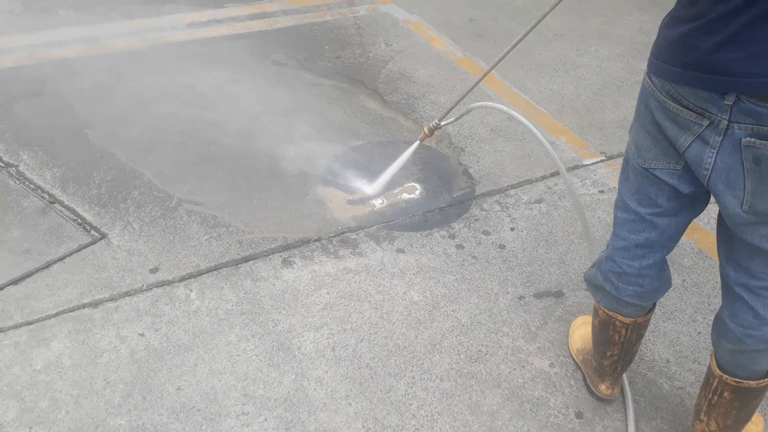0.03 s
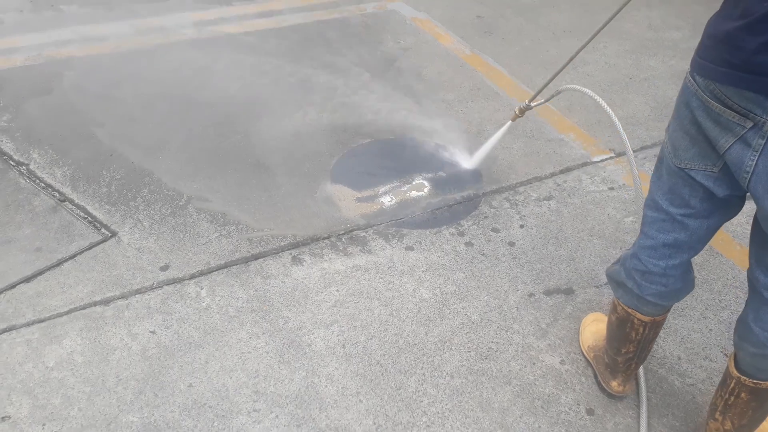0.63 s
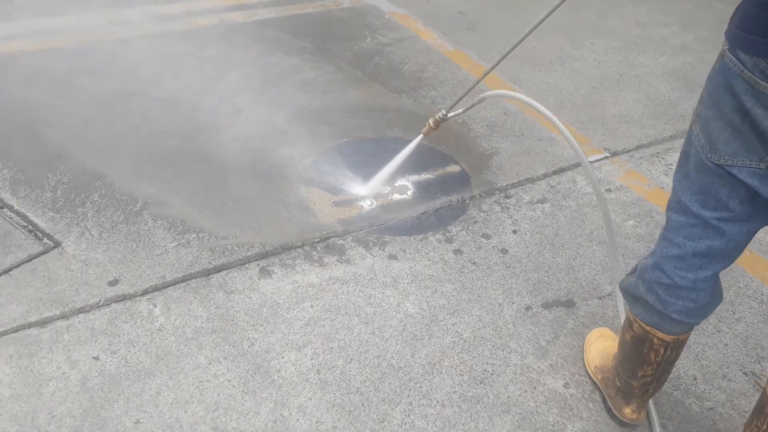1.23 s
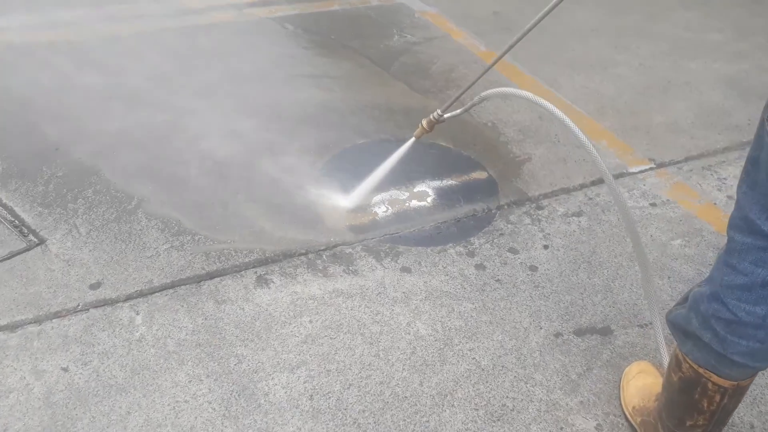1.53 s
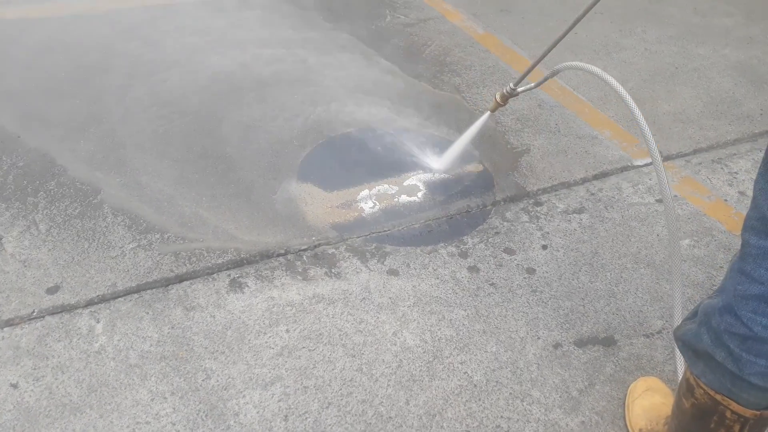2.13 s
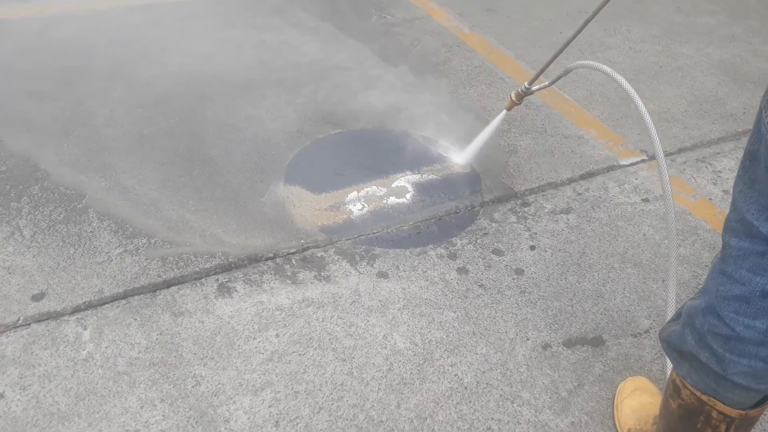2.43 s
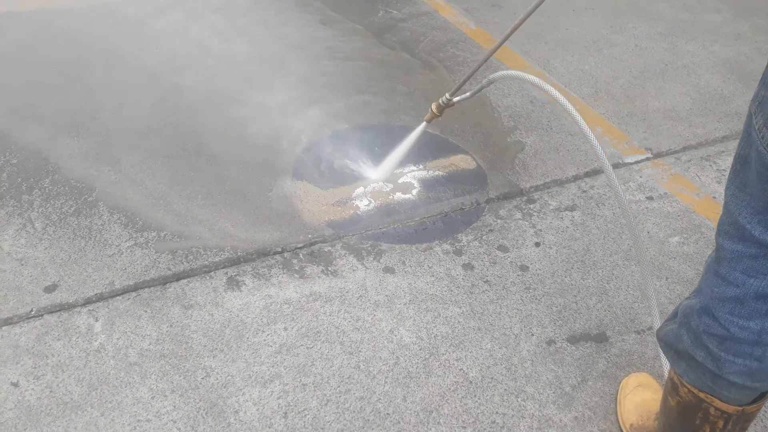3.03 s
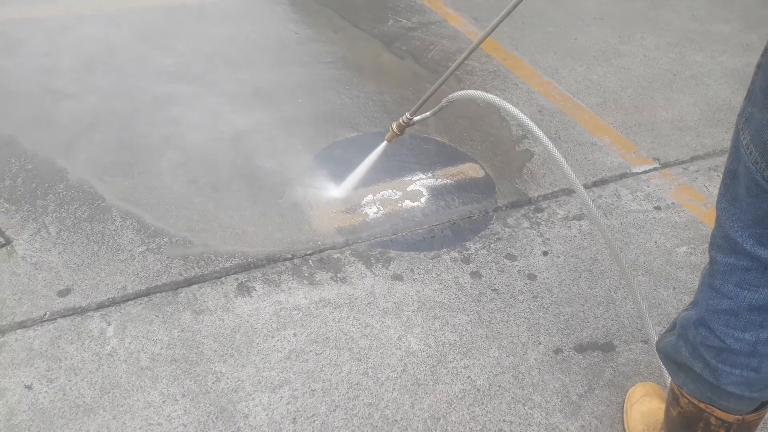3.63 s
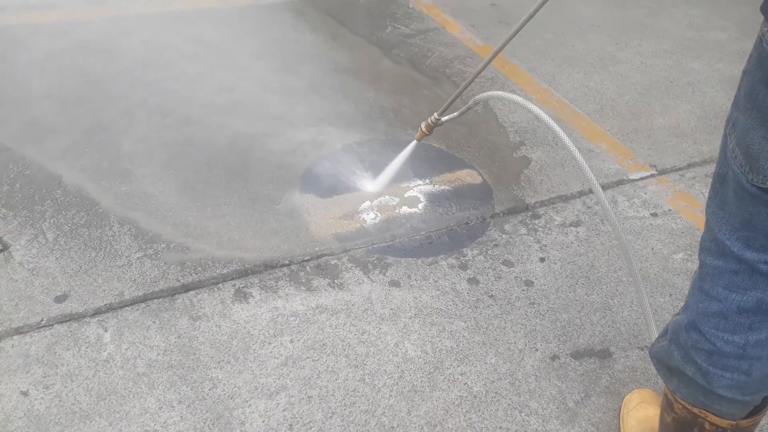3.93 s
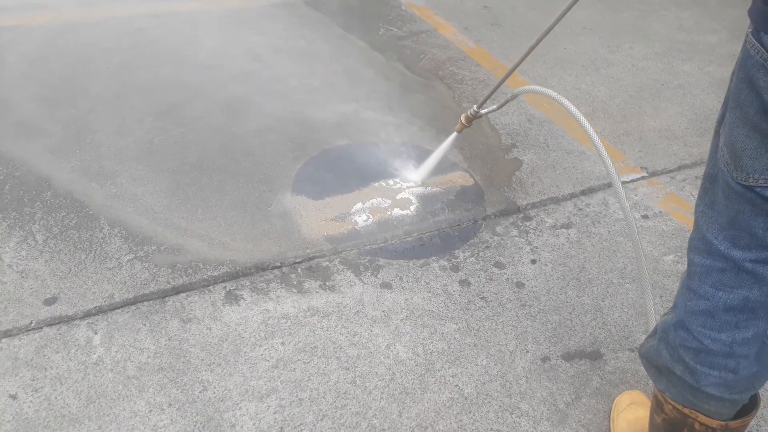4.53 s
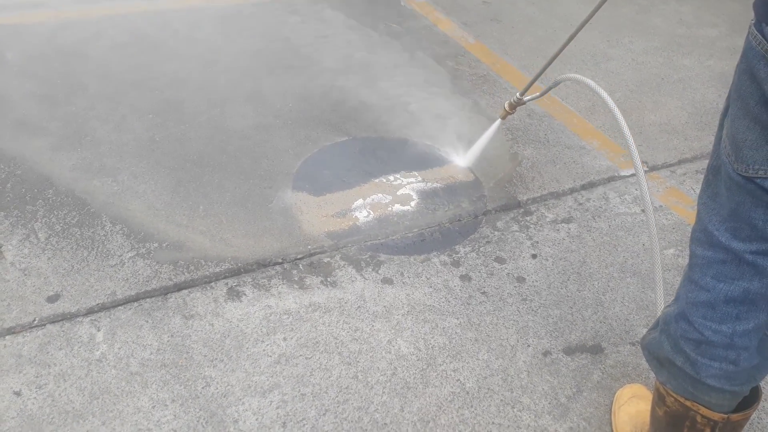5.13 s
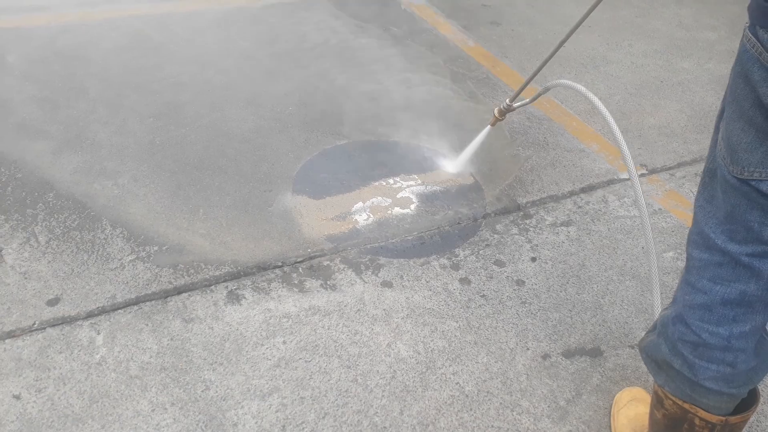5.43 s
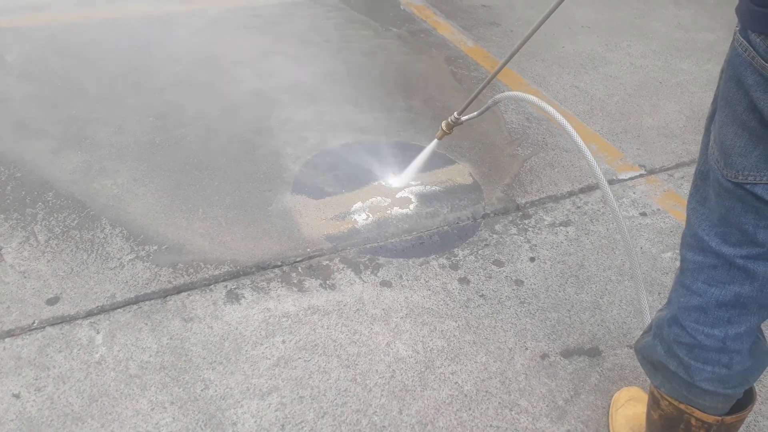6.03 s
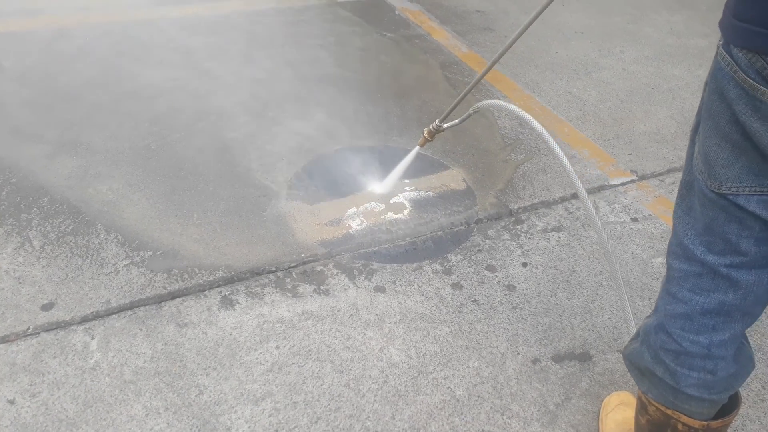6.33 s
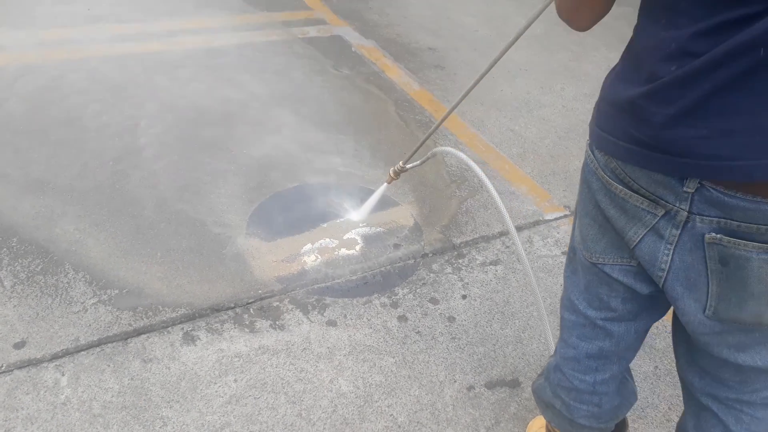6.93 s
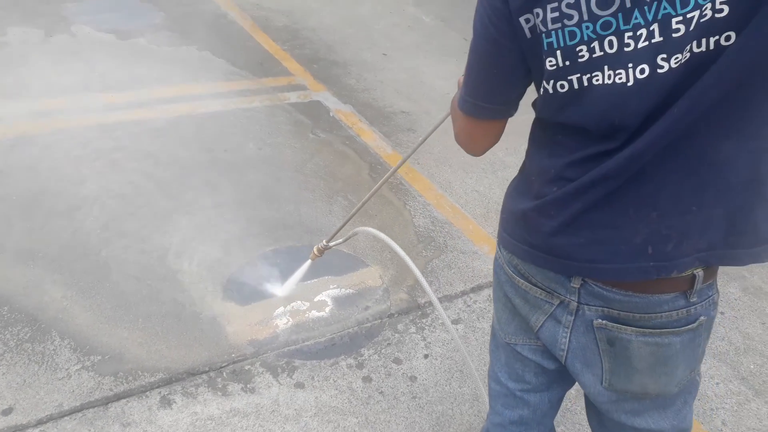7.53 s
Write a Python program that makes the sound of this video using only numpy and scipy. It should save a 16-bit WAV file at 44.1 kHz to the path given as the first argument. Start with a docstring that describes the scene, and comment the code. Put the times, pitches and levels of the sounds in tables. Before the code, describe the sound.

A pressure washer sprays wet concrete outdoors, heard from close by. The jet makes a continuous, bright hiss and a dense spatter of drops, shifting in tone as it sweeps slowly back and forth over a round plate. A thin, fluttering sizzle swells and fades several times. Behind the water, a small engine throbs and a pump hums steadily, slightly louder at the start.

```python
"""Pressure washer on wet concrete

Close by, a jet sweeps to and fro over a round plate in wet concrete. Countless drops make a dense
spatter and hiss, and a fluttering sizzle swells where the jet cuts the puddle. The worker's legs throw
back a moving early echo. Behind it a one-cylinder engine throbs and beats against the pump's hum."""
import sys
import numpy as np
from scipy import signal
from scipy.fft import rfft, irfft, next_fast_len
from scipy.io import wavfile
from scipy.ndimage import uniform_filter1d, map_coordinates

SR = 44100
rng = np.random.default_rng(int(sys.argv[2]) if len(sys.argv) > 2 else 0)


def digitize_waveform(pressure):
    """Quantize a signal to 16-bit integers and store it at the path in sys.argv[1].

    Rows of a 2-D input are taken as channels; values are limited to [-1, 1].
    """
    field = np.atleast_2d(pressure).T
    bounded = np.clip(field, -1, 1)
    quanta = np.round(bounded * 32767).astype(np.int16)
    wavfile.write(sys.argv[1], SR, quanta)


N = 343098
TOP_HZ = 15750  # the sound is cut off above this pitch

# The worker steps back, then in again. Each row: time in seconds, delay in milliseconds of the echo
# off his far leg while the jet is in the middle of the plate.
STANCE = [(0, 2.15), (.9, 2.1), (1.6, 2.6), (2.1, 2.97), (6.3, 2.94), (6.8, 2.72), (7.2, 2.35), (7.78, 1.8)]
STOOD_BACK_MS = np.max(STANCE, axis=0)[1]


def amp(db):
    """Turn decibels into a number to multiply by."""
    return 10 ** (np.asarray(db) / 20)


def unit(x):
    """Scale a signal to an average strength (rms) of 1."""
    return x / np.sqrt(np.mean(x ** 2) + 1e-20)


def along(points, hz):
    """Read between rows of (Hz, value), giving each octave equal room."""
    pitches, values = np.transpose(points)
    return np.interp(np.log(hz + 1), np.log(pitches + 1), values)


def curves(rows):
    """Turn each column after the time into one value per sample."""
    times, *columns = np.transpose(rows)
    return [np.interp(np.arange(N) / SR, times, column) for column in columns]


def wobble(rate):
    """A smooth random curve of strength 1, through `rate` random points a second."""
    points = rng.standard_normal(int(N * rate / SR) + 4)
    return unit(map_coordinates(points, [np.arange(N) * rate / SR]))


def filtered(x, response):
    """Multiply each frequency in x by response(hz)."""
    size = next_fast_len(N + SR // 2)
    return irfft(rfft(x, size) * response(np.fft.rfftfreq(size, 1 / SR)), size)[..., :N]


def turns(hz):
    """The angle, in radians, reached by something turning at a changing rate."""
    return 2 * np.pi * np.cumsum(hz) / SR


def delayed(x, ms):
    """Delay x by a changing number of milliseconds."""
    return map_coordinates(x, [np.arange(N) - ms * SR / 1000], order=3)


def jet_place(t):
    """Where the jet is on the plate: each stroke eases from one turning point to the next."""
    # Turning points. Each row: time in seconds, place from -1 (left rim) to 1 (right rim).
    strokes = [(0, -0.41), (.68, 0.78), (1.55, -0.56), (2.42, 0.86), (3.45, -0.69), (5.25, 0.84),
               (6.3, -0.22), (6.8, 0.014), (7.8, -0.93)]
    times, places = np.transpose(strokes)
    numbers = np.arange(len(times))
    stroke, progress = np.divmod(np.interp(t, times, numbers), 1)
    return np.interp(stroke + (1 - np.cos(np.pi * progress)) / 2, numbers, places)


def closeness(t):
    """0 when the worker stands farthest back, 1 when he is nearest."""
    times, delay_ms = np.transpose(STANCE)
    return (STOOD_BACK_MS - np.interp(t, times, delay_ms)) / np.ptp(delay_ms)


def echo_ms(t, sweep_ms=0.17):
    """The echo off the far leg comes later as the worker steps back or the jet moves right."""
    return np.interp(t, *np.transpose(STANCE)) + sweep_ms * jet_place(t)


def drops(size_spread_db=4.0, hit_share=0.26):
    """Countless drop impacts of uneven size, merging into a rush."""
    sizes = rng.standard_normal(N) * amp(size_spread_db * rng.standard_normal(N))
    hits = unit(sizes * (rng.random(N) < 0.12))
    return np.sqrt(hit_share) * hits + np.sqrt(1 - hit_share) * rng.standard_normal(N)


def hollow_rings(splash, width_hz=125, dip_above_hz=300, dip_depth=0.72, bend_hz=35, shimmer_db=1.9):
    """The splash rings hollow, each ring with a dip just above it; its treble shimmers in patches."""
    # Rings that swell and fade as the jet crosses the plate. Each row: time of the peak in seconds,
    # seconds spent above half the boost, pitch in Hz (bend_hz lower at the right rim), boost in dB.
    plate_rings = [(.3, 0.76, 2720, 1.5), (.5, 0.43, 840, 5), (0.847, 0.28, 1820, 5.5),
                   (1.655, 0.25, 2270, 8), (3.602, 0.74, 2600, 4.5), (3.6, .4, 5430, 9),
                   (4.6, 6, 2998, 4.5), (5.3, 1.6, 6780, 5), (5.3, 1.3, 9650, 3.5), (7.0, .55, 2270, 8.5),
                   (7.65, 0.41, 2300, 5.5), (7.7, 0.32, 2980, 4)]
    # Lasting rings that glide up together as the worker closes in.
    # Each row: pitch in Hz when he stands back, boost in dB.
    gliding_rings = [(3700, 1), (4080, 1.5), (4420, 2.5), (5000, 1)]
    hz, t, spectrum = signal.stft(splash, SR, nperseg=1024)
    bump = lambda centre: np.exp(-0.5 * ((hz[:, None] - centre) / width_hz) ** 2)
    ring = lambda centre: bump(centre) - dip_depth * bump(centre + dip_above_hz)
    bend = bend_hz * jet_place(t)
    swelling = sum(boost_db * 0.5 ** ((2 * (t - peak) / length) ** 2) * ring(pitch - bend)
                   for peak, length, pitch, boost_db in plate_rings)
    rise = (STOOD_BACK_MS / echo_ms(t)) ** 0.62
    gliding = sum(boost_db * ring(pitch * rise) for pitch, boost_db in gliding_rings)
    patches = uniform_filter1d(rng.standard_normal(spectrum.shape), size=4, axis=0)  # blur over pitch
    patches = uniform_filter1d(patches, size=40, axis=1)  # and over time
    shimmer = shimmer_db * unit(patches) * np.sqrt(hz[:, None] / 6000)
    return signal.istft(spectrum * amp(swelling + gliding + shimmer), SR, nperseg=1024)[1][:N]


def spray(surge, mist_db=-0.8, surge_db=0.45):
    """Drops strike the slab: coarse ones thud and spatter, the finest fizz and drift off as mist."""
    # The water's tone before it is split into layers. Each row: frequency in Hz, relative level in dB.
    water_tone = [(150, -29), (400, -10), (800, -5.5), (1000, -6.5), (1300, -4.5), (1750, -7), (3400, -4),
                  (4000, 0), (4950, 2), (6000, -4.5), (6800, -2.5), (7500, -4.5), (10300, 2), (15500, -0.5)]
    # Layers 0 to 4: impact, spatter, rush, hiss, fizz. Each row: level in dB, then dB added with the
    # jet at the right, with the jet at either rim, with the worker close, and per second of drift.
    layers = [(-30, 0.04, 0.3, 0.6, -0.14), (-28.5, -1.1, 1.6, 1.6, 0.18), (-21.5, 2.4, -1.3, -3, -0.05),
              (-23, 0.7, -0.2, 2.3, -0.1), (-22, 1.5, -2, -2.5, .5)]
    # Layer 5: the mist, the top treble. Each row: time in seconds, level in dB before mist_db is added.
    mist = [(0.15, -22), (0.17, -21), (1.25, -19), (1.5, -20), (2.27, -20), (3.62, -23.5), (5.8, -22),
            (6.33, -25.5), (6.71, -22.5), (7.01, -24.5), (7.37, -17.5), (7.75, -19)]
    # Frequencies in Hz; at each one, the layer numbered in zone_layer takes over.
    zone_hz = [1450, 2700, 4100, 5000, 6500, 7500, 9900, 11000, 12400]
    zone_layer = np.array([0, 1, 2, 2, 3, 3, 4, 4, 5])
    splash = filtered(drops(), lambda hz: amp(along(water_tone, hz)) * (hz < TOP_HZ))
    water = hollow_rings(splash)
    t = np.arange(N) / SR
    across = jet_place(t)
    close = closeness(t) ** 1.65  # his body colours the spray mostly when he is nearest
    levels = [db + right_db * across + rim_db * across ** 2 + close_db * close + drift * (t - t.mean())
              for db, right_db, rim_db, close_db, drift in layers]
    levels.append(curves(mist)[0] + mist_db)
    band = lambda layer: unit(filtered(water, lambda hz: np.interp(hz, zone_hz, zone_layer == layer)))
    return sum(amp(level) * band(layer) for layer, level in enumerate(levels)) * amp(surge_db * surge)


def sizzle(surge, pitch_hz=8510, rise_hz_per_db=30, width_hz=370, wander_hz=60, flutter_db=0.8):
    """A narrow, sputtering ring where the jet tears the water film; it sinks in pitch as it swells."""
    # The sizzle's swells. Each row: time in seconds, strength in dB, which steers level and pitch.
    swells = [(0.15, -21), (0.36, -24.5), (0.91, -26.5), (1.63, -19), (2.67, -25), (3.03, -20),
              (4.11, -18.5), (4.97, -24), (5.95, -22), (6.29, -17), (6.77, -22), (7.01, -20), (7.26, -23),
              (7.75, -20.5)]
    strength, = curves(swells)
    weaker_db = strength.max() - strength
    level_db = strength.max() + 1.4 - 1.48 * weaker_db
    slow_noise = filtered(rng.standard_normal((2, N)), lambda hz: 1 / np.sqrt(1 + (hz / width_hz) ** 6))
    phase = turns(pitch_hz + rise_hz_per_db * weaker_db + wander_hz * wobble(3))
    tone = slow_noise[0] * np.cos(phase) + slow_noise[1] * np.sin(phase)  # noise moved up to the pitch
    flutter = amp(flutter_db * wobble(170) + 0.05 * surge)
    return amp(level_db) * unit(tone * flutter)


def leg_echoes(jet, fold_gain=0.05):
    """Add the spray's echoes off the worker; they come sooner and stronger as he steps closer."""
    # Echoes off boots, legs and hip. Each row: delay in milliseconds when he stands back,
    # share of the far leg's movement, gain when he stands back.
    echoes = [(1.67, 0.22, 0.13), (1.98, 0.581, 0.1), (2.18, 0.653, -0.11), (2.43, 1.125, 0.085),
              (2.96, 0.992, 0.12), (3.5, 1.01, 0.076)]
    far_ms = echo_ms(np.arange(N) / SR)
    # a leg is too narrow to throw back long waves, and cloth dulls the shortest
    bounce = filtered(jet, lambda hz: hz / np.hypot(hz, 1500) / np.hypot(1, hz / 16000))
    body = sum(gain * delayed(bounce, ms + share * (far_ms - STOOD_BACK_MS))
               for ms, share, gain in echoes)
    # folds of the clothes scatter weak copies whose paths all stretch together
    folds = sum(rng.choice([-1, 1]) * delayed(bounce, far_ms * rng.uniform(0.5, 1.5)) for _ in range(8))
    return jet + (STOOD_BACK_MS / far_ms) ** 0.36 * body + fold_gain * folds


def engine_and_pump(pump_turns_per_firing=2.7031, tones_db=1, rumble_db=-5, shake_db=0.46, puff=0.2):
    """Exhaust pulses, rumble and pump hum; the pump's third harmonic beats with the engine's eighth."""
    # Engine speed. Each row: time in seconds, firings per second.
    speed = [(1.8, 25.857), (4.0, 25.945)]
    # The machine's loudness. Each row: time in seconds, base level in dB.
    loudness = [(0.15, -28.5), (0.55, -26.5), (2.52, -31.5), (4.96, -31.5), (7.7, -31.5)]
    # The exhaust note. Each row: multiple of the firing rate, relative level in dB.
    exhaust_harmonics = [(2, -30), (3, -60), (4, -18.5), (5, -6), (6, -1.5), (7, -31), (8, -11.5),
                         (9, -28.5), (10, -16.5), (12, -24.5), (13, -17.5), (14, -19), (16, -22.5),
                         (17, -25), (21, -37), (31, -21.5), (33, -23)]
    # The pump's hum. Each row: multiple of its turning rate, relative level in dB.
    pump_harmonics = [(2, -22.5), (3, -8.5), (4, -21), (5, -16), (6, -18.5), (7, -21), (8, -43)]
    # The rumble's tone. Each row: frequency in Hz, relative level in dB.
    rumble_tone = [(20, -38), (45, -28), (80, -5), (130, -4.5), (200, 2), (290, -3), (350, 1), (550, -7),
                   (900, -10.5), (2500, -13), (8000, -62)]
    cycle = turns(curves(speed)[0])
    level, = curves(loudness)
    # the muffler smears each pulse: higher harmonics leave it later
    exhaust = sum(amp(db) * np.cos(k * cycle - 0.582 * k * k) for k, db in exhaust_harmonics)
    hum = sum(amp(db + wobble(4.3)) * np.sin(k * pump_turns_per_firing * cycle)
              for k, db in pump_harmonics)
    tones = np.sqrt(2) * (amp(shake_db * wobble(26)) * exhaust + hum)
    puffs = rng.standard_normal(N) * (1 + puff * np.cos(cycle))
    rumble = unit(filtered(puffs, lambda hz: amp(along(rumble_tone, hz))))
    # the rumble arrives by many paths, so its level moves less
    steadier_level = level.mean() + 0.45 * (level - level.mean())
    return amp(level + tones_db) * tones + amp(steadier_level + rumble_db) * rumble


def scene():
    """Jet and machine, heard at one point: the same in both channels."""
    surge = 0.5 * wobble(60) + 0.54 * wobble(17)  # the jet breaks up unevenly
    mono = leg_echoes(spray(surge) + sizzle(surge)) + engine_and_pump()
    return np.array([mono, mono])


def record(dry):
    """The sound cuts in abruptly; the tallest peaks are rounded off and the top treble is removed."""
    start_s, ceiling = 0.105, 0.84
    opening = np.clip((np.arange(N) / SR - start_s) / 0.001, amp(-68), 1)
    rounded = dry / (1 + np.abs(dry / ceiling) ** 6) ** (1 / 6)
    return filtered(rounded * opening, lambda hz: np.clip((TOP_HZ - hz) / 250 + 0.5, 0, 1))


dry = scene()
out = record(dry)
digitize_waveform(out)
```